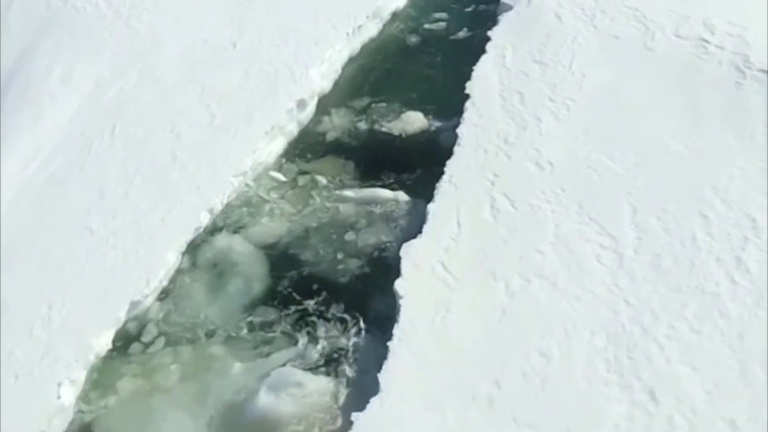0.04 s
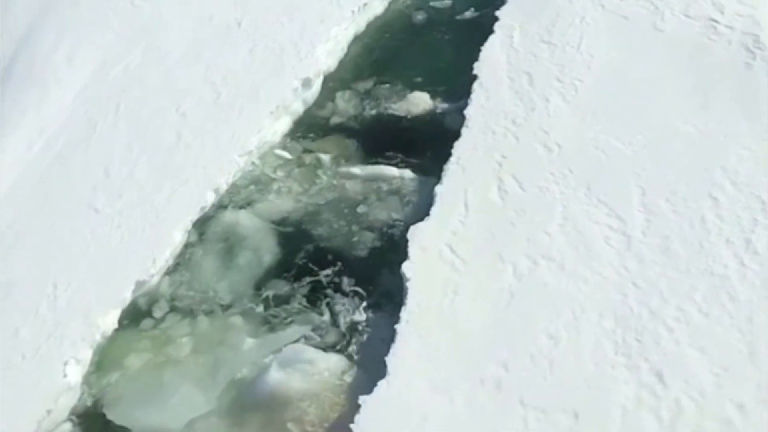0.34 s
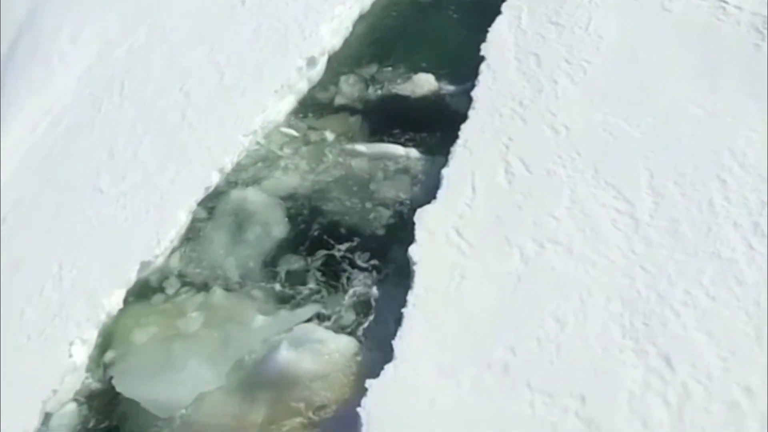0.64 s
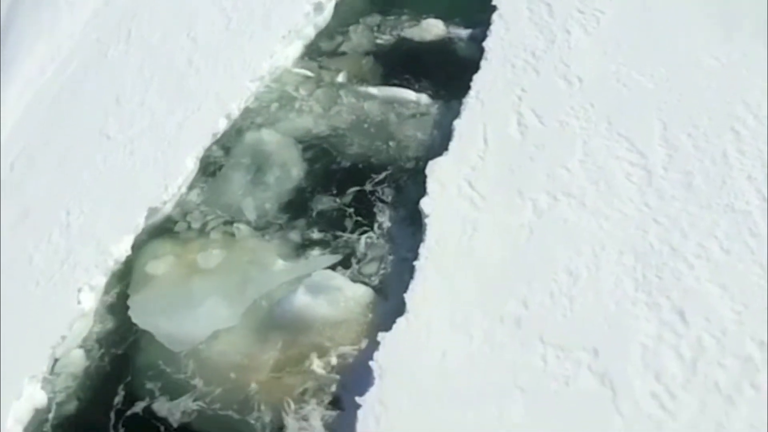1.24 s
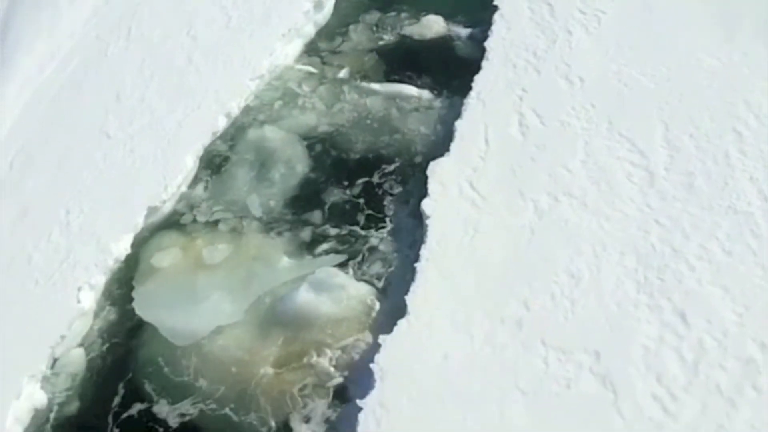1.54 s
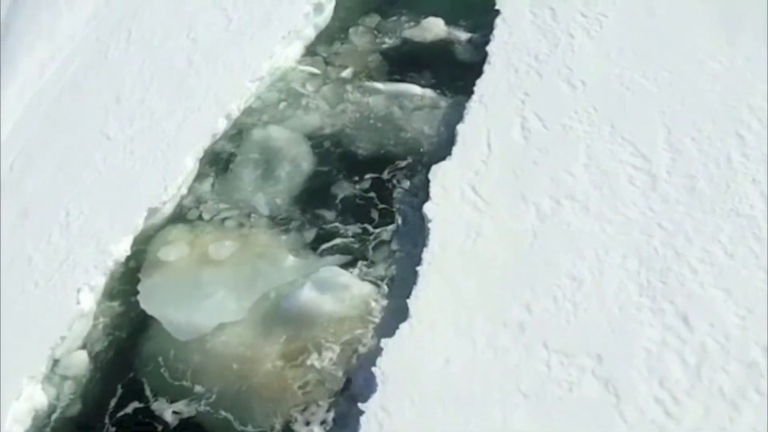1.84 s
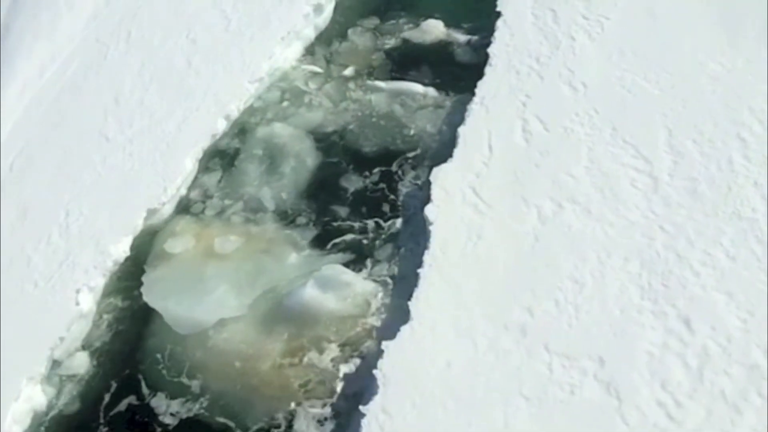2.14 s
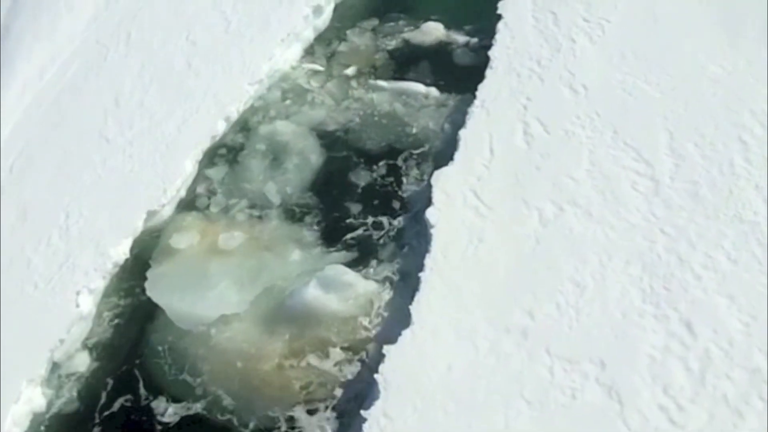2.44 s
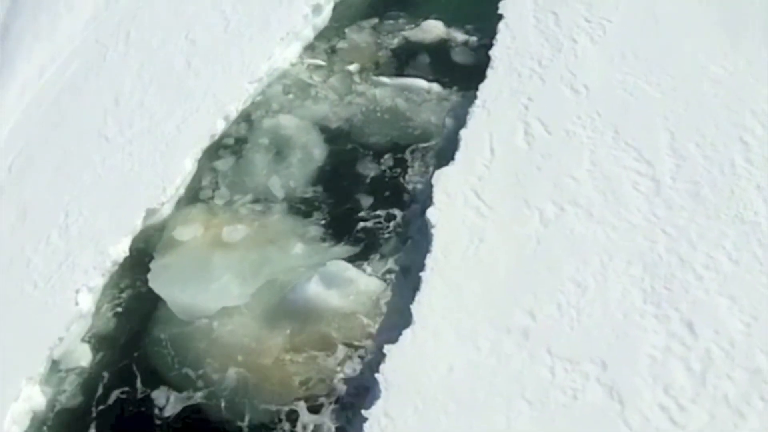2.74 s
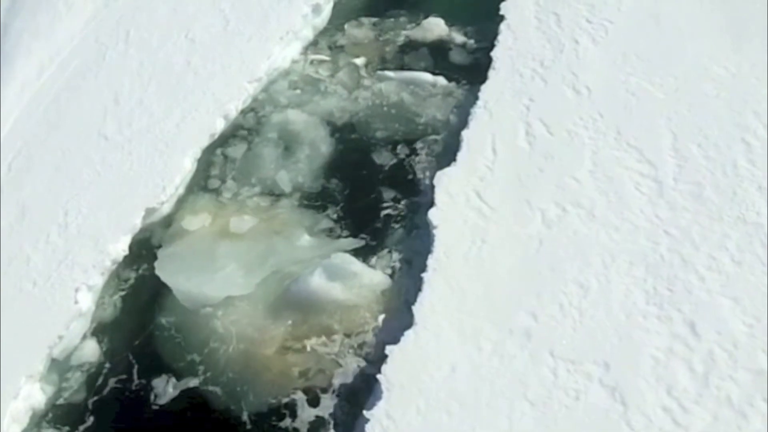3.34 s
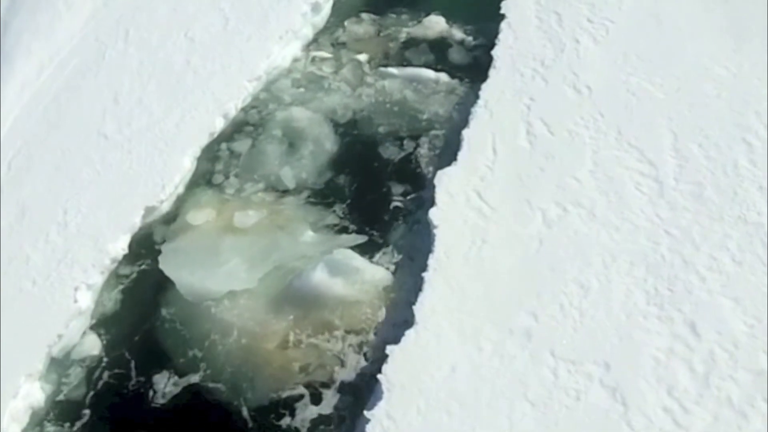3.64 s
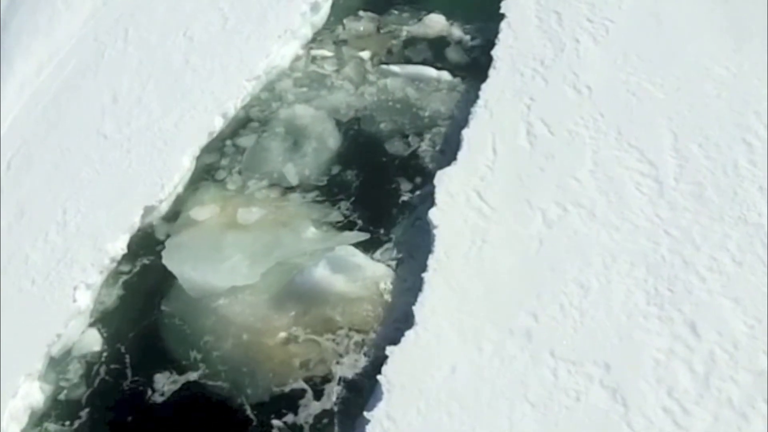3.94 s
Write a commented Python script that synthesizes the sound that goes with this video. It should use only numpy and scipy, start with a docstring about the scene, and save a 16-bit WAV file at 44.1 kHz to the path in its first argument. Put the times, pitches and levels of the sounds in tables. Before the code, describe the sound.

A ship's diesel engines throb low and steady for all four seconds, heard from the deck over wind and hull rumble. Water bubbles, splashes and fizzes between broken floes, easing slightly after 2 seconds. Small sharp ice snaps scatter from the start to 2.6 seconds and return near 3.6. Slush surges softly now and then, and a rolling floe gives a quick cluster of dull knocks around 1.6 seconds.

```python
"""A ship's twin diesel engines throb through the hull as it pushes through sea ice, heard from the deck.
Their sound is a stack of tones called orders, each a whole multiple of the engine's cycle rate.
Below, bubbles churn, splash and fizz between broken floes. Ice crackles and snaps, slush surges,
and one floe knocks dully as it rolls over. Wind and hull rumble underneath it all."""
import sys
import numpy as np
from scipy import signal
from scipy.fft import rfft, irfft
from scipy.io import wavfile

SR = 44100
rng = np.random.default_rng(int(sys.argv[2]) if len(sys.argv) > 2 else 0)


def dump(signal):
    """Clip the signal to [-1, 1] and save it as 16-bit WAV at the path in sys.argv[1]."""
    limited = np.clip(np.atleast_2d(signal).T, -1, 1)
    pcm = np.round(limited * 32767).astype(np.int16)
    wavfile.write(sys.argv[1], SR, pcm)


N = 176400
TIME = np.arange(N) / SR

# spectrum of the wind and hull rumble (f/Hz, relative level/dB)
RUMBLE_SPECTRUM = [(5, -4), (14, 7.5), (35, -1.5), (60, -6), (90, -10), (155, -12), (190, -21.5),
                   (300, -35), (700, -62.5)]
# spectra of the low, middle and high parts of the wake (f/Hz, relative level/dB)
CHURN_SPECTRUM = [(100, -31), (200, 1.5), (260, -2), (450, -0.5), (800, -1.2), (1100, -10), (1700, -19),
                  (4000, -44)]
SPLASH_SPECTRUM = [(400, -8), (900, .3), (1300, -.5), (2200, .4), (3000, -1.8), (4200, -5.2), (5500, -6.5),
                   (8000, -52)]
FIZZ_SPECTRUM = [(2500, -23), (4500, -8), (5800, -3), (7200, 1.5), (8200, -3), (10000, -11.2),
                 (12000, -20.5), (15000, -38)]
# how the churning rises and falls (t/s, relative level/dB)
CHURN_LEVELS = [(0.04, -44.5), (.6, -46.7), (1.2, -45.7), (1.45, -44), (1.68, -44.8), (1.85, -45.5),
                (2.04, -44.3), (2.1, -48), (2.33, -46.2), (2.62, -47), (2.9, -49.3), (3.18, -50),
                (3.27, -47), (3.45, -50), (3.7, -48.5), (3.94, -48)]
# how the rest of the wake rises and falls (t/s, relative splash level/dB, relative fizz level/dB)
SPLASH_FIZZ_LEVELS = [(0.02, -45, -49), (0.08, -47, -50.5), (0.125, -45.5, -48), (0.17, -47, -50.5),
                      (.3, -47.5, -51.7), (.5, -47.5, -50.3), (.68, -48, -51.3), (.8, -47.7, -49.7),
                      (1.3, -48.7, -51), (1.43, -46.7, -51.3), (1.72, -47, -50.7), (1.81, -48, -51.5),
                      (1.9, -46.3, -48.7), (2.01, -46.5, -50.2), (2.1, -51, -53), (2.19, -49.5, -51.2),
                      (2.24, -51, -54), (2.41, -48.7, -52.8), (2.5, -50.2, -54.5), (2.58, -49.8, -53.3),
                      (2.8, -52.2, -55.8), (3.5, -54, -55.7), (3.55, -50.5, -53), (3.67, -51, -53.3),
                      (3.86, -52.5, -55), (3.96, -50.5, -53.7)]
# snaps of ice (t/s, level/dB, centre f/Hz, decay time/s)
ICE_SNAPS = [(.135, -44, 7500, .003), (.719, -40, 7600, .0015), (.750, -37.5, 3000, .003),
             (.784, -39, 7800, .003), (1.017, -37.5, 8500, .003), (1.133, -39, 7000, .003),
             (1.291, -39, 7000, .003), (1.597, -38, 8500, .004), (1.766, -37.5, 7000, .006),
             (1.881, -40, 6000, .004), (1.904, -37, 6500, .004), (2.192, -41.5, 7800, .006),
             (2.398, -35.5, 5600, .004), (2.461, -37, 3940, .003), (2.581, -43, 7800, .002),
             (3.590, -42, 3000, .004), (3.670, -38, 7400, .004), (3.948, -41, 3000, .005)]
# surges of slush and water (t/s, length/s, level/dB, centre f/Hz)
SLUSH_SURGES = [(0, .2, -44.5, 235), (1.26, 0.19, -47, 700), (1.525, 0.12, -42.5, 338),
                (1.888, 0.028, -42.5, 950), (2.12, .09, -46, 280), (2.30, 0.5, -53, 1340),
                (2.43, 0.17, -48, 450), (3.53, 0.1, -48.5, 2050), (3.67, .33, -50.5, 260)]
# knocks of the rolling floe (t/s, level/dB, pitch ratio)
FLOE_KNOCKS = [(1.539, -33.5, .98), (1.567, -38, 1), (1.607, -45, 1.05), (1.637, -39, .95)]
# tones the floe rings with (f/Hz, relative level/dB, time to fade by 60 dB/s)
FLOE_TONES = [(246, 3, .13), (296, -10.5, .09), (385, -6, 0.068), (480, -6, 0.052)]
# engine speed (t/s, cycle rate/Hz)
ENGINE_SPEED = [(0, 7.54), (.75, 7.515), (1.3, 7.485), (2.25, 7.47), (2.75, 7.445), (3.2, 7.42), (4, 7.42)]
# the engine's strong low tones swell and fade (t/s, then level/dB for each of LOW_ORDERS)
LOW_ORDER_LEVELS = [(0, -30, -25, -23, -29, -44, -36, -47), (.6, -36, -29, -18.7, -37, -28, -42, -52),
                    (1.1, -35, -27, -17.5, -38, -25.5, -35, -60), (1.55, -37, -33, -18, -38, -25, -32, -51),
                    (2.4, -39, -38, -19.3, -36, -30.5, -33, -47),
                    (2.95, -41, -35, -20.5, -36, -35, -32.5, -44), (3.4, -39, -35, -22, -31, -41, -33, -41),
                    (4, -44, -35, -22, -31, -37, -33, -41)]
# the engine's weaker, higher tones (order, base level/dB)
UPPER_ORDERS = [(11, -39.5), (12, -45), (13, -49), (14, -48), (15, -49.5), (16, -39.5), (17, -48),
                (18, -51), (19, -48.5), (20, -46.5), (21, -49), (23, -56.5), (24, -60.5), (27, -59.5),
                (32, -60.5), (46, -59.5), (59, -62)]

LOW_ORDERS = (3, 4, 5, 6, 7, 9, 10)
HULL_ORDER, TWIN_ORDER, FIRING_ORDER = 5, 7, 8
HEAVY_STROKE_S, IN_STEP_S, TWIN_LEAD_HZ = 2.043, 1.42, .0185
THROB_DB, WAVER_DB, RISE_DB_PER_S = 4, 2.03, 1.5


def amp(db):
    """Turns decibels into a gain."""
    return 10 ** (np.asarray(db) / 20)


def unit(x):
    """Scales a signal to an average (rms) size of one."""
    return x / np.sqrt(np.mean(x ** 2) + 1e-20)


def curve(table, column):
    """Joins the points in one column of a time table, giving a value for every sample."""
    rows = np.array(table)
    return np.interp(TIME, rows[:, 0], rows[:, column])


def colour(x, spectrum):
    """Shapes a sound with a spectrum, then scales it to an average size of one."""
    hz, db = np.transpose(spectrum)
    f = np.fft.rfftfreq(N, 1 / SR) + 1
    gain = amp(np.interp(np.log(f), np.log(hz), db))
    return unit(irfft(rfft(x) * gain, N))


def drift(rate_hz):
    """A smooth random wobble, up to about the given rate."""
    f = np.fft.rfftfreq(N, 1 / SR)
    return unit(irfft(rfft(rng.standard_normal(N)) * (f > 0) * np.exp(-(f / rate_hz) ** 2), N))


def band_noise(hz, size, octaves=.5):
    """A short stretch of noise around a centre frequency."""
    f = np.fft.rfftfreq(size, 1 / SR) + 1
    band = np.exp(-.5 * (np.log2(f / hz) / octaves) ** 2)
    return unit(irfft(rfft(rng.standard_normal(size)) * band, size))


def add(mix, start_s, sound):
    """Mixes a sound in at the given time."""
    part = mix[max(round(start_s * SR), 0):][:len(sound)]
    part += sound[:len(part)]


def rumble():
    """Low wind and hull noise, easing by one decibel a second."""
    return amp(-32.5 - (TIME - TIME.mean())) * colour(rng.standard_normal(N), RUMBLE_SPECTRUM)


def bubbles(low_hz, high_hz, per_s, cycles, spread_db, glide, sizes=24):
    """A shower of tiny fading rings: long ones sound like bubbles, short ones like crackle."""
    out = np.zeros(N)
    for hz in np.geomspace(low_hz, high_hz, sizes):
        life = cycles / hz
        t = np.arange(0, 2 * life, 1 / SR)
        ring = np.exp(-np.pi * t / life) * np.sin(2 * np.pi * hz * t * (1 + glide * t / life))
        hits = np.flatnonzero(rng.random(N) < per_s / sizes / SR)
        kicks = np.zeros(N)
        kicks[hits] = rng.choice([-1, 1], len(hits))
        kicks[hits] *= amp(spread_db * np.minimum(rng.exponential(1, len(hits)), 4))
        out += signal.oaconvolve(kicks, ring / np.linalg.norm(ring))[:N]
    return unit(out)


def water(spectrum, near, near_db, flutter_db, flutter_hz):
    """Near bubbles over the hiss of countless far ones, fluttering together."""
    far = rng.standard_normal(N)
    return colour(far + amp(near_db) * near, spectrum) * amp(flutter_db * drift(flutter_hz))


def wake():
    """Big bubbles churn, small ones splash, and foam and ice crumbs fizz."""
    big = bubbles(218.7, 1492, per_s=600, cycles=5.9, spread_db=2, glide=.058)
    churn = water(CHURN_SPECTRUM, big, near_db=-5, flutter_db=.5, flutter_hz=14)
    small = bubbles(888, 5670, per_s=1500, cycles=6.1, spread_db=4, glide=.03)
    splash = water(SPLASH_SPECTRUM, small, near_db=-8, flutter_db=.5, flutter_hz=24)
    foam = bubbles(3970, 12600, per_s=2200, cycles=4.8, spread_db=4.6, glide=0)
    fizz = water(FIZZ_SPECTRUM, foam, near_db=-6, flutter_db=.9, flutter_hz=22)
    churn *= amp(1 + curve(CHURN_LEVELS, column=1))
    splash *= amp(1.5 + curve(SPLASH_FIZZ_LEVELS, column=1))
    fizz *= amp(3 + curve(SPLASH_FIZZ_LEVELS, column=2))
    slosh = amp(.39 * drift(13))
    return slosh * (churn + splash + fizz)


def ice_snaps():
    """Brittle ice breaks in bursts of bright noise that start sharply and die fast."""
    out, t = np.zeros(N), TIME[:SR // 4]
    attack = np.minimum(t / .0003, 1)
    for start_s, db, hz, decay_s in ICE_SNAPS:
        add(out, start_s, amp(db) * attack * np.exp(-t / decay_s) * band_noise(hz, len(t)))
    return out


def slush_surges():
    """Slush and water surge in soft swells of noise."""
    out = np.zeros(N)
    for start_s, length_s, db, hz in SLUSH_SURGES:
        swell = np.sqrt(np.hanning(round(length_s * SR)))
        add(out, start_s, amp(db) * swell * band_noise(hz, len(swell)))
    return out


def floe_knocks():
    """A slab of floating ice rolls over, ringing briefly with a few low tones at each knock."""
    out, t = np.zeros(N), TIME[:SR // 4]
    for start_s, db, pitch in FLOE_KNOCKS:
        for hz, tone_db, fade_s in FLOE_TONES:
            fade = np.exp(-np.log(1000) * t / fade_s)
            sign = rng.choice([-1, 1])
            tone = np.sin(2 * np.pi * hz * pitch * rng.uniform(.96, 1.04) * t)
            add(out, start_s, amp(db + tone_db) * fade * sign * tone)
    return out


def engines():
    """Two slow diesels shake the hull; their low tones line up in one heavy stroke per cycle."""
    cycles = np.cumsum(curve(ENGINE_SPEED, column=1)) / SR
    angle = 2 * np.pi * (cycles - np.interp(HEAVY_STROKE_S, TIME, cycles))
    # the twin runs a hair faster, so the two firing hums beat slowly, partly cancelling when in step
    twin_angle = angle + 2 * np.pi * TWIN_LEAD_HZ * (TIME - IN_STEP_S)
    out = amp(-24) * np.sin(FIRING_ORDER * twin_angle) - amp(-26.5) * np.sin(FIRING_ORDER * angle)
    for column, order in enumerate(LOW_ORDERS, start=1):
        side = -1 if order < HULL_ORDER else 1  # below its own pitch the hull swings the other way
        tone = np.cos(order * (twin_angle if order == TWIN_ORDER else angle))
        out += side * amp(curve(LOW_ORDER_LEVELS, column)) * tone
    # all upper tones waver; the lower of them also swell with each stroke and slowly grow
    throb_db = THROB_DB * (np.cos(angle) - .5)
    rise_db = RISE_DB_PER_S * (TIME - TIME.mean())
    for order, db in UPPER_ORDERS:
        phase = 2 * np.pi * rng.random() + .34 * drift(1.47)
        level_db = db + rise_db * (order <= 27) + throb_db * (order < 22) + WAVER_DB * drift(3.5)
        out += amp(level_db) * np.cos(order * angle + phase)
    return np.sqrt(2) * out


def scene():
    """Engines, rumble, wake and ice (its highest treble cut), the same in both ears."""
    ship = engines() + rumble() + wake()
    treble_cut = signal.butter(10, 10200, fs=SR, output="sos")
    ice = signal.sosfilt(treble_cut, ice_snaps() + slush_surges() + floe_knocks())
    return np.tile(ship + ice, (2, 1))


def record(dry):
    """Softens both ends, carves a deep dip in the treble and cuts off the very top."""
    fade_s, top_hz = .004, 15100
    dip_hz, dip_width_hz, dip_db = 5450, 1380, -29.5
    faded = dry * np.minimum(np.minimum(TIME, TIME[::-1]) / fade_s, 1)
    offset = 1j * (np.fft.rfftfreq(2 * N, 1 / SR) - dip_hz) / dip_width_hz
    dip = (offset + amp(dip_db)) / (offset + 1)
    dipped = irfft(rfft(faded, 2 * N) * dip)[:, :N]
    top_cut = signal.firwin(511, top_hz, window=("kaiser", 9), fs=SR)
    return signal.oaconvolve(dipped, top_cut[None], "same")


dry = scene()
out = record(dry)
dump(out)
```